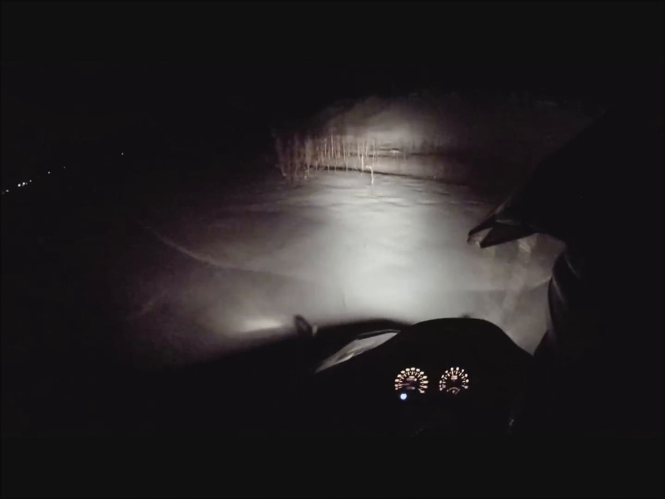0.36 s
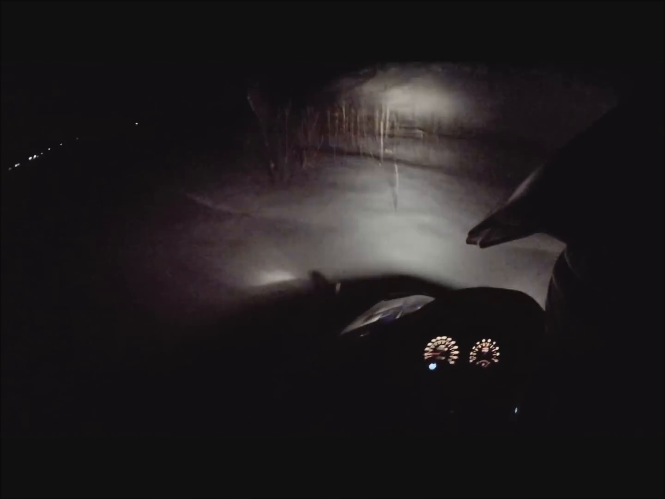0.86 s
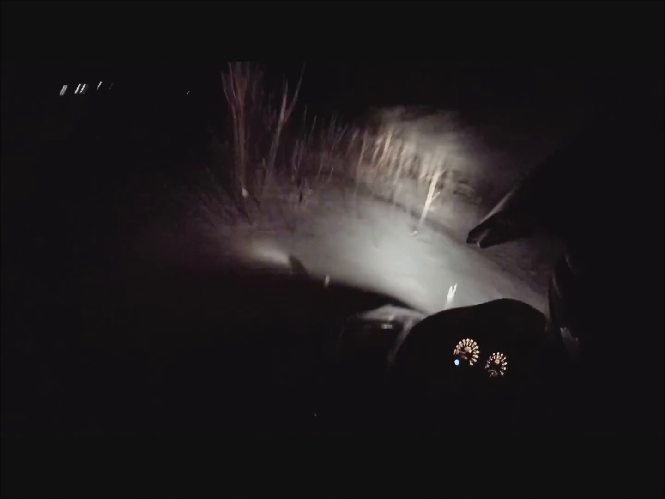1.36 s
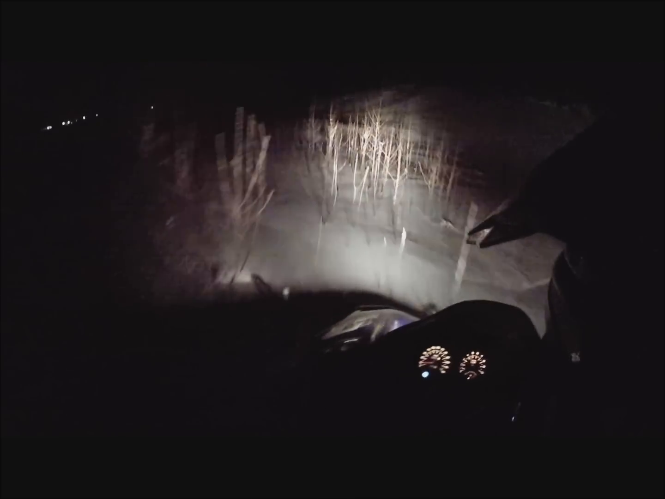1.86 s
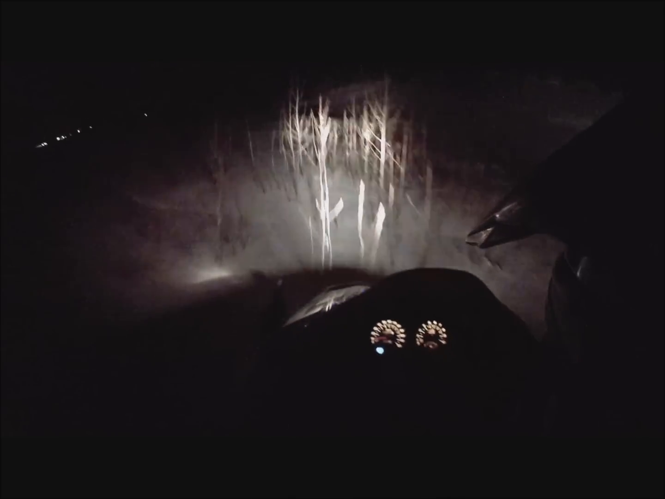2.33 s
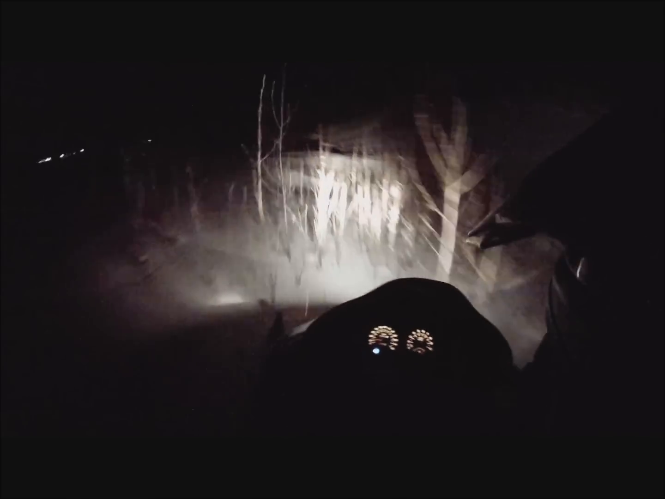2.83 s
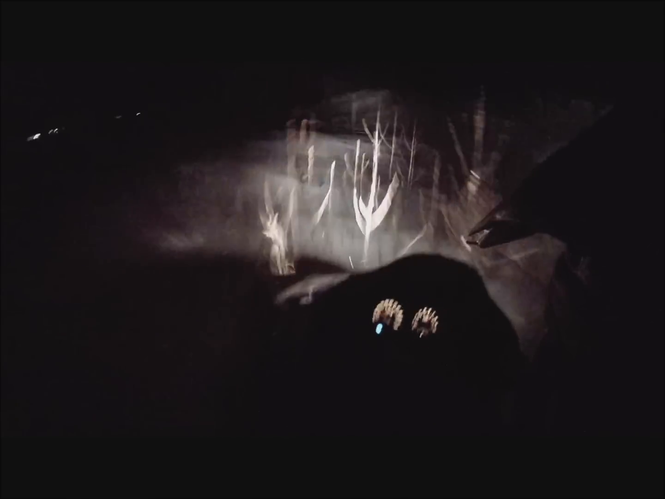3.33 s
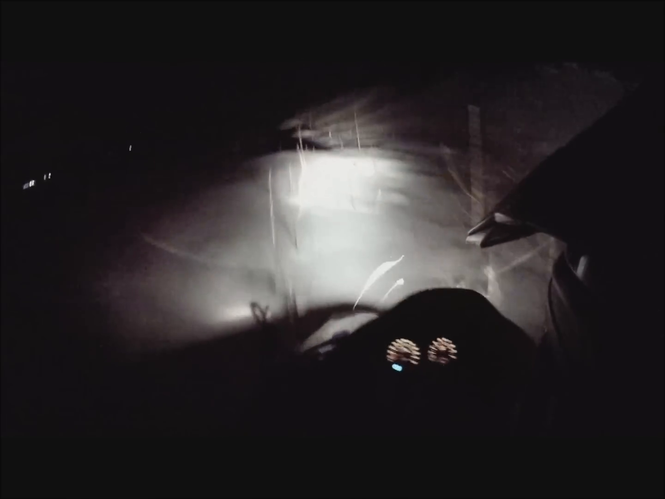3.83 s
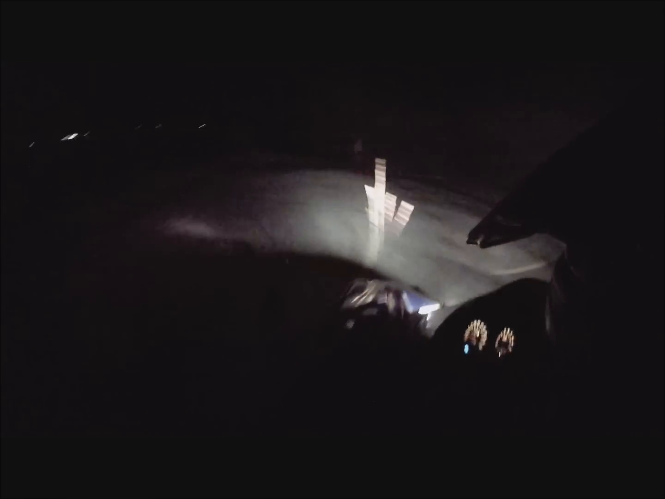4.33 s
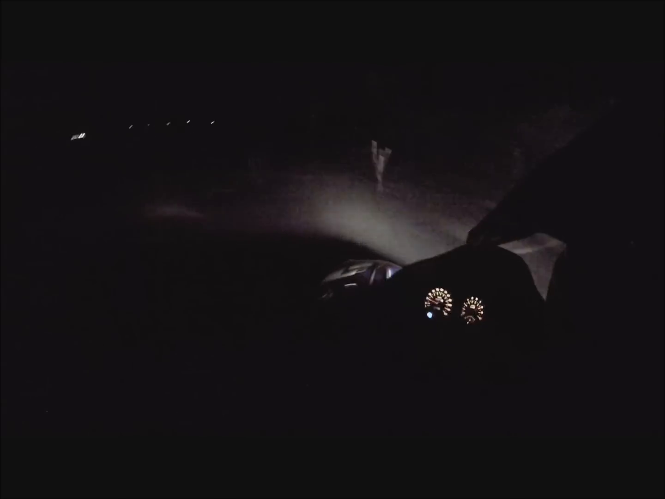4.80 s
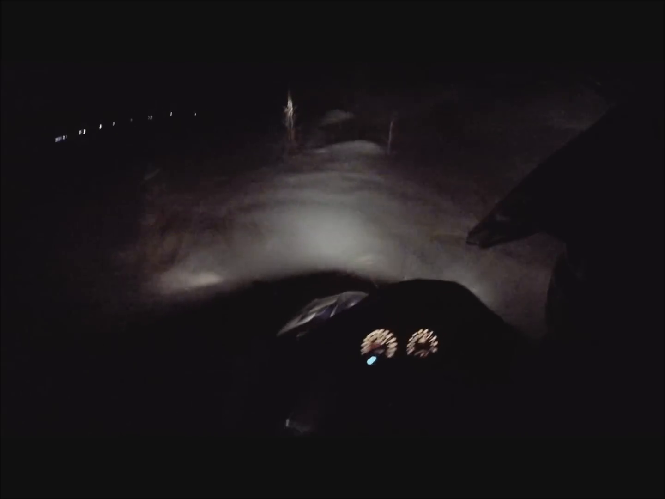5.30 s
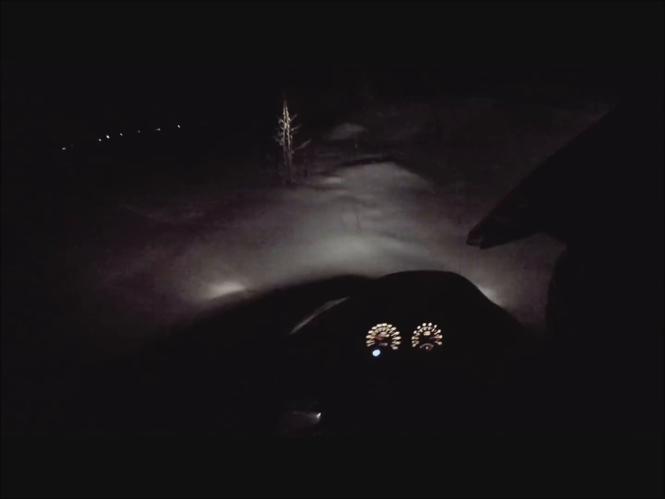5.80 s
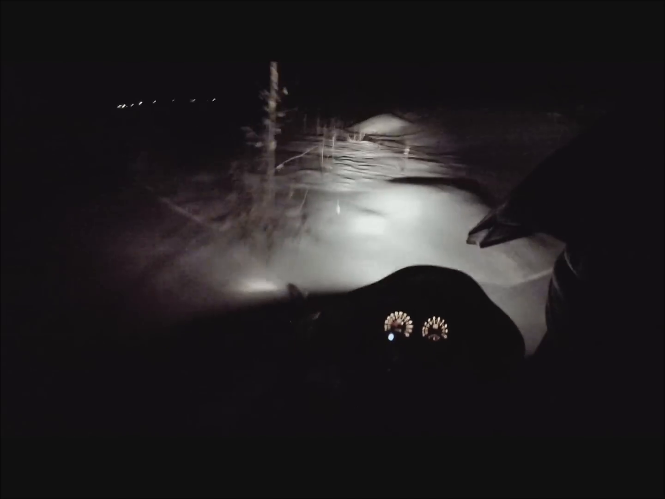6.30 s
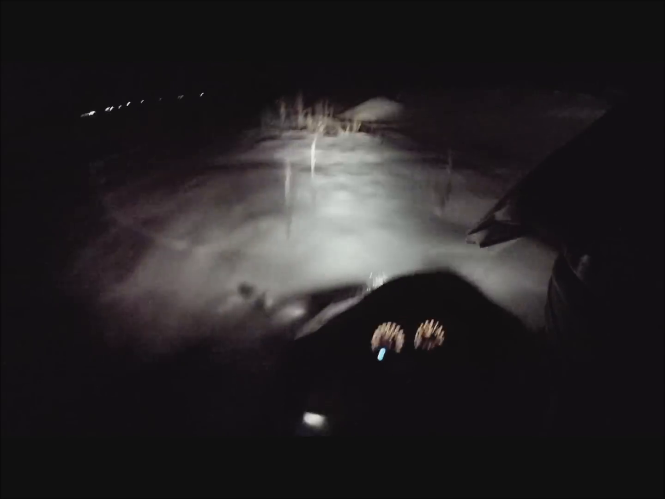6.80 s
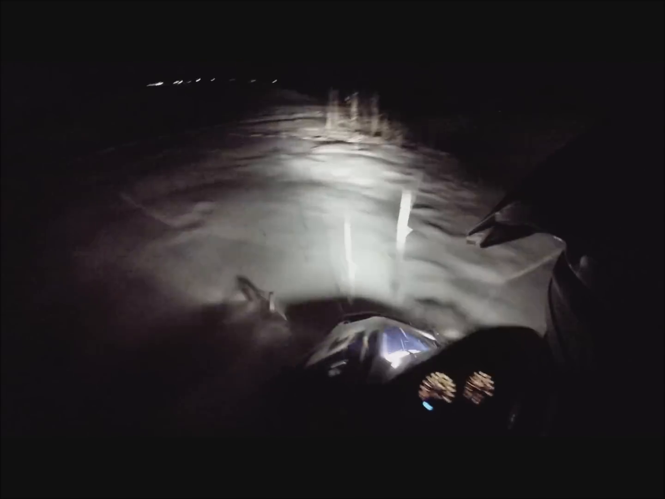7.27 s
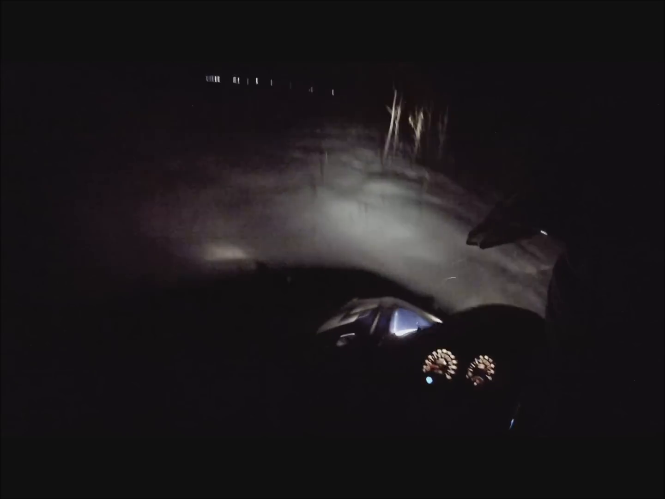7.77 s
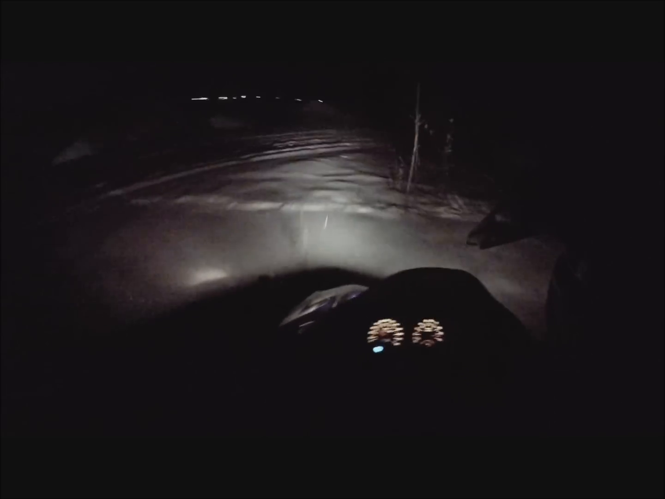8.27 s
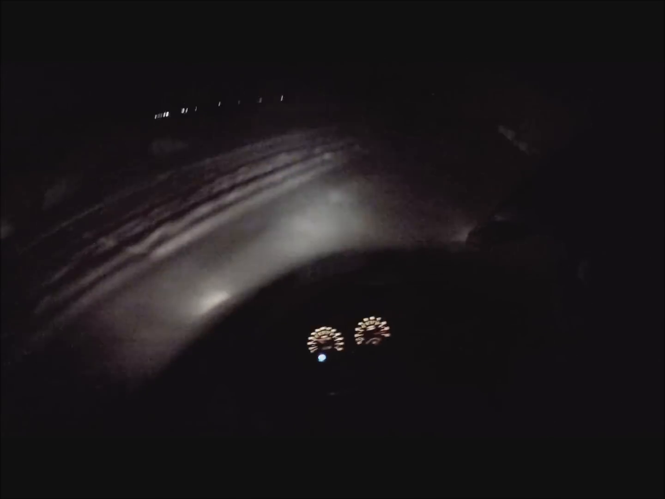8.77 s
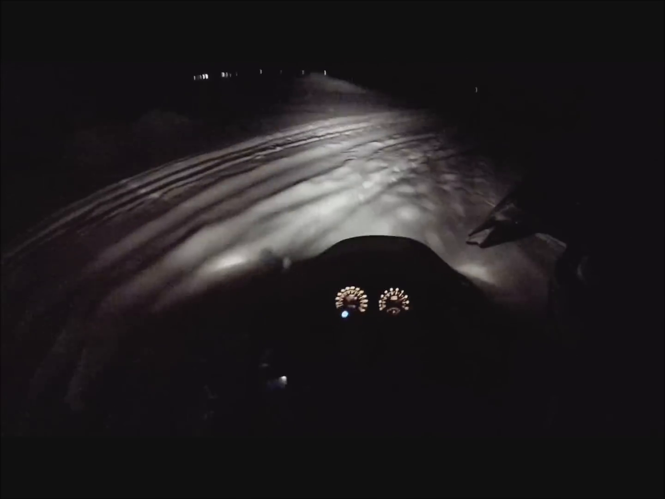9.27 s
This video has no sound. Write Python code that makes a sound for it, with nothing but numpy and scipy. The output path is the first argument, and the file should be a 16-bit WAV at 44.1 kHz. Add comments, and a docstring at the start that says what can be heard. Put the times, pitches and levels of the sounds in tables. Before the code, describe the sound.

Close on-board sound of a two-stroke snowmobile running over open snow. The engine starts at a middling growl, blips up near 0.9 seconds, then sags to a low burble by 1.9. It climbs raspily in two surges, peaking around 2.5 and 3.1, and drops back until 4. A strong pull screams up to 4.6, falls by 5, then rises again in bursts to a high peak near 5.8, with track hum emerging. Revs tumble to the lowest, quietest growl between 6.6 and 7.1. From 7.3 the engine climbs fast and holds a nearly steady high, roaring buzz from 7.8 to 9.1, track whine beneath, before sliding down to the end at about 9.6. Low wind buffets in gusts, notably near 2.6, 5 and 8.6. The cheap microphone adds gritty, metallic mirrored treble, and the sound briefly thins and turns watery throughout.

```python
"""Heard from the rider's seat: a three-cylinder two-stroke snowmobile blipped on and off the throttle.
Engine: sines at the crank orders sweep through exhaust resonances, over noise pulsed by the crank angle.
Track: sines at the lug rate and its half and third. Wind: low noise that swells in gusts.
The small camera samples slowly and holds each value, which mirrors the sound up into the treble;
at moments the sound thins to its bass and a few strong tones."""
import sys
import numpy as np
from scipy import signal
from scipy.fft import rfft, irfft
from scipy.io import wavfile
from scipy.ndimage import uniform_filter1d

SR = 44100
rng = np.random.default_rng(int(sys.argv[2]) if len(sys.argv) > 2 else 0)


def boost_factor(decibels):
    """Convert a level in decibels to a linear amplitude factor."""
    exponent = np.asarray(decibels, float) / 20
    return 10 ** exponent


def master_out(mix):
    """Clip the mix to full scale and print it as 16-bit PCM to the path in sys.argv[1]."""
    frames = np.transpose(np.atleast_2d(mix))
    ceiling = np.clip(frames, -1, 1)
    pcm = np.round(ceiling * 32767).astype(np.int16)
    wavfile.write(sys.argv[1], SR, pcm)


N = 424683

# Wind level. Each row: time in seconds, level in dB before gusts.
WIND_LEVEL = [(0, -44.5), (2.3, -45.5), (2.7, -43), (3.1, -43.5), (3.8, -45), (4.3, -48), (4.9, -48),
              (5.6, -54), (6.2, -42.5), (7.3, -48), (8.2, -47), (9.63, -41.5)]
# Wind spectrum. Each row: frequency in Hz, relative gain in dB.
WIND_SPECTRUM = [(20, -13), (38, 0), (55, -13.5), (130, -5), (200, -12), (350, -19.5), (700, -38)]
# Wind gusts. Each row: time of the peak in seconds, rise over the wind in dB.
WIND_GUSTS = [(2.5, 7), (2.71, 13), (3.83, 1), (4.82, 5), (5.07, 7), (8.58, 7)]
# Track lugs over the wheels, one list a pull. Each row: time in seconds, lugs per second, level in dB before fades.
TRACK_PULLS = [
    [(5.55, 183, -57), (5.802, 222.5, -47), (5.854, 236, -39), (5.972, 190, -41.5), (6.114, 137, -49),
     (6.4, 120, -29)],
    [(7.6, 210, -68), (7.67, 165.6, -29), (7.83, 194, -36), (8.09, 246, -40.5), (8.44, 268.2, -41),
     (8.93, 287, -35), (9.05, 274, -35), (9.4, 157, -44), (9.56, 170, -32), (9.63, 100, -52)],
]
# Engine speed. Each row: time in seconds, crank turns per second.
CRANK_SPEED = [(0.0, 78), (0.62, 76), (0.68, 79.6), (0.93, 105), (1.17, 83.9), (1.51, 72.1), (1.94, 65.9),
               (2.08, 70.9), (2.25, 94.7), (2.38, 110.1), (2.495, 130), (2.64, 108.9), (2.84, 101.5),
               (2.93, 114.5), (3.08, 142), (3.31, 101.8), (3.42, 88.7), (3.71, 76.6), (3.97, 72),
               (4.09, 84.5), (4.39, 141), (4.57, 153), (4.9, 92.2), (5.03, 76), (5.29, 105), (5.49, 148),
               (5.54, 150), (5.66, 142.3), (5.85, 153), (6.03, 113.8), (6.13, 98.6), (6.6, 61.0),
               (7.05, 58.5), (7.2, 66.0), (7.36, 81.2), (7.55, 113.2), (7.72, 146), (7.8, 153.5),
               (8.1, 157.7), (8.31, 156.5), (8.53, 157.2), (8.73, 155.4), (8.8, 156.6), (9.07, 155.2),
               (9.14, 137.3), (9.3, 120.0), (9.62, 100.6)]
# Crank orders 1, 2, 3, ..: relative strength in dB. Order 3, the firing note, takes its level elsewhere.
ORDER_DB = [-10, -7, 0, 0, -2, 9, 0, 0, 9, 5, 5, 4, 5, -1, 4, 1, 0, 3, 0, -4, -3, -5, -6, -5]
# Exhaust and hood resonances that the orders sweep through. Each row: centre in Hz, width in Hz, gain in dB.
EXHAUST_MODES = [(116, 149, -24), (305, 115, -22), (393, 55, -7), (549, 67, -23), (825, 93, -14),
                 (935, 162, -22), (1279, 203, -23), (1532, 203, -22), (1865, 234, -22), (2171, 249, -17),
                 (2441, 263, -11), (2812, 69, -15), (2930, 269, -22), (3397, 281, -16)]
# Hood, housing and microphone resonances of the roar. Each row: centre in Hz, width in Hz, relative gain in dB.
ROAR_MODES = [(274, 115, -11), (510, 79, -11), (873, 89, 0.5), (1238, 90, -2.5), (1556, 140, -6.5),
              (1875, 73, -1.5), (2183, 183, -1), (2391, 44, 4), (2523, 69, 5), (2850, 110, -9.5),
              (3537, 300, -1.5)]
# Loudness against revs. Each row: crank turns per second, then roar, firing note, low and high orders in dB.
REV_LEVELS = [(59.8, -42, -52.5, -74, -75), (67.7, -37, -45, -69.5, -47), (76.3, -36.5, -49, -48.5, -42),
              (95.3, -32.5, -45, -38.5, -33), (103.8, -29, -48.5, -36.5, -28.5),
              (132.7, -23.5, -40.5, -27.5, -29.5), (152, -19.5, -40.5, -31, -34.5),
              (152.8, -24, -47.5, -26.5, -29.5)]
# Throttle settings. Each row: start in seconds, end in seconds,
# then dB added to roar, firing note, low and high orders.
THROTTLE_PULLS = [(0.64, 0.81, 6.5, 9.5, 11.5, 11.5), (0.802, 0.95, 0.5, 8.5, 6, 6.5),
                  (2.06, 2.506, 4.5, 6.5, 12.5, 10), (2.62, 2.844, 1, 15.5, 2, 3),
                  (2.852, 3.068, 3.5, 11, 12.5, 10), (4.0, 4.336, 8, 8.5, 10.5, 9.5),
                  (4.297, 4.587, -3.5, 4.5, 3, 14.5), (5.084, 5.322, 7, 5, 11.5, 6.5),
                  (5.332, 5.575, 0.5, 11.5, 16.5, 11.5), (5.61, 5.902, 1, 10, 12.5, 14),
                  (7.29, 7.556, 10.5, 7.5, 13.5, 9.5), (7.588, 7.759, 1, 14, 11, 16),
                  (7.766, 7.935, 5, 5.5, 11, 15), (7.935, 8.304, 3.5, 4.5, 13, 8.5),
                  (8.309, 9.1, 3.5, 19, 12.5, 14.5), (9.227, 9.8, -2.5, -1, 5, 1)]
# Moments when the sound thins, the deeper the longer. Each row: time in seconds, nominal gain between tones in dB.
THIN_MOMENTS = [(1.23, -13), (1.439, -11), (1.721, -12), (1.993, -13), (2.17, -13), (2.332, -14),
                (2.576, -11), (2.871, -11), (3.103, -12), (3.37, -24), (3.9, -15), (4.237, -12),
                (4.831, -13), (4.917, -11), (4.991, -21), (5.13, -15), (5.624, -13), (5.789, -13),
                (6.581, -15), (6.672, -12), (7.255, -21), (7.566, -12), (7.652, -14), (7.938, -21),
                (8.009, -11), (8.238, -23), (8.42, -11), (9.429, -22)]


def evened(x):
    """Scales to rms 1."""
    return x / np.sqrt(np.mean(x ** 2) + 1e-20)


def curve(rows):
    """Interpolates the columns of a timed table at every sample."""
    s, *columns = np.transpose(rows)
    return [np.interp(np.arange(N) / SR, s, c) for c in columns]


def modes(table, hz, order=2):
    """Gain of a set of resonances, powers added; a higher order gives steeper skirts."""
    return np.sqrt(sum(boost_factor(db) ** 2 / (1 + abs(2 * (hz - f) / width) ** order) for f, width, db in table))


def wander(points_per_s):
    """Slow random curve of rms 1: straight lines between random points."""
    points = rng.standard_normal(2000)
    return evened(np.interp(np.arange(N) * points_per_s / SR, np.arange(2000), points))


def coloured(gain):
    """Noise of rms 1 with the gain given as a function of frequency."""
    return evened(irfft(rfft(rng.standard_normal(N)) * gain(np.fft.rfftfreq(N, 1 / SR)), N))


def bump(centre_s, width_s):
    """A soft rise and fall around one moment."""
    return np.exp(-((np.arange(N) / SR - centre_s) / width_s) ** 2)


def wind():
    """Lumpy low buffeting on the microphone: low noise under random swells and timed gusts."""
    hz_points, db_points = np.transpose(WIND_SPECTRUM)
    rumble = coloured(lambda hz: boost_factor(np.interp(np.log(hz + 1), np.log(hz_points), db_points)))
    lumpy = evened(rumble * boost_factor(2.2 * wander(14)))
    gusts_db = sum(db * bump(s, width_s=0.11) for s, db in WIND_GUSTS)
    return boost_factor(curve(WIND_LEVEL)[0] + gusts_db + 2 * wander(4)) * lumpy


def track():
    """A slightly wavering hum at the lug rate, with weaker tones at half and a third of it from the wheels."""
    fade_s = 0.45
    t = np.arange(N) / SR
    out = np.zeros(N)
    for rows in TRACK_PULLS:
        lug_hz, level_db = curve(rows)
        angle = 2 * np.pi * np.cumsum(lug_hz * (1 + 0.0058 * wander(18))) / SR
        fade = np.clip(np.minimum(t - rows[0][0], rows[-1][0] - t) / fade_s, 0, 1)
        wheels = boost_factor(-15.5) * np.sin(angle / 2) + boost_factor(-10.5) * np.sin(angle / 3)
        out += fade * boost_factor(level_db) * np.sqrt(2) * (np.sin(angle) + wheels)
    return out


def engine_levels(speed):
    """Roar, firing note, low and high orders in dB: louder with revs, plus each throttle setting."""
    turns, *columns = np.transpose(REV_LEVELS)
    ramp_s = np.c_[[0.29, 0.031, 0.031, 0.14]]  # time to follow the throttle
    late_s = np.c_[[0.04, 0, 0, 0]]  # the roar trails the throttle
    t = np.arange(N) / SR - late_s
    throttle_db = 0
    for start_s, end_s, *db in THROTTLE_PULLS:
        opened = np.clip(np.minimum(t - start_s, end_s - t) / ramp_s + 0.5, 0, 1)
        throttle_db = throttle_db + np.c_[db] * opened
    return np.array([np.interp(speed, turns, c) for c in columns]) + throttle_db


def crank_orders(speed, angle, firing_db, low_db, high_db):
    """Sines at multiples of the crank rate, shaped by exhaust resonances; a shut throttle mutes them."""
    turns_per_s2 = uniform_filter1d(np.gradient(speed) * SR, size=1500)
    shut = np.clip(-turns_per_s2 / 60, 0, 1)  # falling revs mean a shut throttle
    changing = np.clip(abs(turns_per_s2) / 120, 0.15, 1)
    notes = np.zeros(N)
    for k, order_db in enumerate(ORDER_DB, start=1):
        if k == 3:
            level = boost_factor(firing_db - 6 * shut)
        else:
            group_db = (low_db if k <= 10 else high_db) - 8 * shut
            level = boost_factor(group_db + order_db) * modes(EXHAUST_MODES, k * speed, order=4)
        # each order swells on its own, more when coasting
        swell = boost_factor((1.8 + 3 * shut) * wander(12) + 1.2 * wander(3))
        # uneven firing blurs the high orders, most while the revs move
        slip_rad = 0.08 * max(k - 8, 1) * changing * wander(45)
        phase = k * angle + slip_rad + 2 * np.pi * rng.random()
        notes += np.sqrt(2) * level * swell * np.sin(phase)
    return notes


def engine_roar(angle, roar_db):
    """Resonant noise pulsing slightly once and three times a turn; brighter when louder."""
    pulse = 1 + 0.037 * np.cos(angle) + 0.076 * np.cos(3 * angle)
    roar = coloured(lambda hz: modes(ROAR_MODES, hz)) * pulse
    dull = signal.sosfiltfilt(signal.butter(2, 1500, fs=SR, output="sos"), roar)
    bright = roar - dull
    tilted = bright + dull * boost_factor(-0.3 * (roar_db + 30))
    return boost_factor(roar_db + 1.1 * wander(30)) * tilted


def engine():
    """One crank angle, the running sum of the speed, drives both the orders and the roar."""
    speed = uniform_filter1d(curve(CRANK_SPEED)[0], size=1300)  # the flywheel rounds each change
    roar_db, firing_db, low_db, high_db = engine_levels(speed)
    angle = 2 * np.pi * np.cumsum(speed * (1 + 0.0005 * wander(30))) / SR
    return crank_orders(speed, angle, firing_db, low_db, high_db) + engine_roar(angle, roar_db)


def scene():
    """All sources at one microphone."""
    return (wind() + track() + engine())[None]


def sampled_and_held(x):
    """Low-pass, 8 kHz sampling, each value held six steps at 48 kHz: the steps mirror the sound upward."""
    low_pass = signal.butter(10, 3600, fs=SR, output="sos")
    slow = signal.resample_poly(signal.sosfiltfilt(low_pass, x), up=80, down=441)
    return signal.resample_poly(np.repeat(slow, repeats=6), up=147, down=160)


def thinned(x):
    """At given and random moments only the bass and the strongest narrow bands pass; the rest sinks."""
    faint_db, faint_per_s, length_s_per_db = -8, 0.8, 0.0015
    hz, t, z = signal.stft(x, SR, nperseg=768, noverlap=640)
    faint = [(s, faint_db) for s in rng.uniform(0, N / SR, round(faint_per_s * N / SR))]
    depth_db = 0
    for s, db in THIN_MOMENTS + faint:
        reach_s = -db * length_s_per_db / 2 + 0.003
        depth_db = depth_db + np.clip((reach_s - abs(t - s)) / 0.005, 0, 1) * db
    lasting = uniform_filter1d(abs(z), size=11, axis=1)  # tones that hold bridge the gap
    weak = (lasting < boost_factor(-8) * lasting.max(0)) & (hz[:, None] > 220)
    return signal.istft(z * boost_factor(1.05 * depth_db * weak), nperseg=768, noverlap=640)[1]


def band_limit(x):
    """A steep low-pass at the top of the band."""
    return signal.sosfilt(signal.butter(12, 15710, fs=SR, output="sos"), x)


def record(dry):
    """Slow sampling with held values, then brief thinning."""
    held = sampled_and_held(dry[0])
    mix = thinned(np.pad(held, (0, 64))[3:])[:N]  # starts 3 samples in, about half a hold
    return band_limit(mix[None])


dry = scene()
out = record(dry)
master_out(out)
```